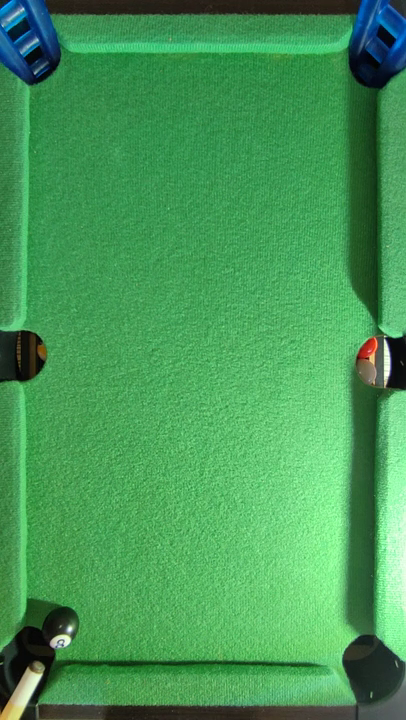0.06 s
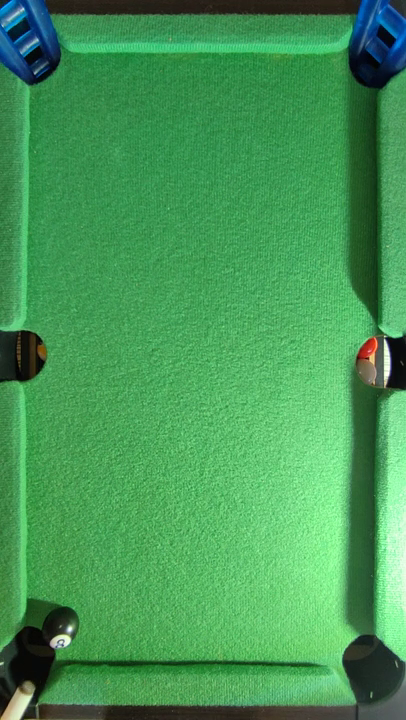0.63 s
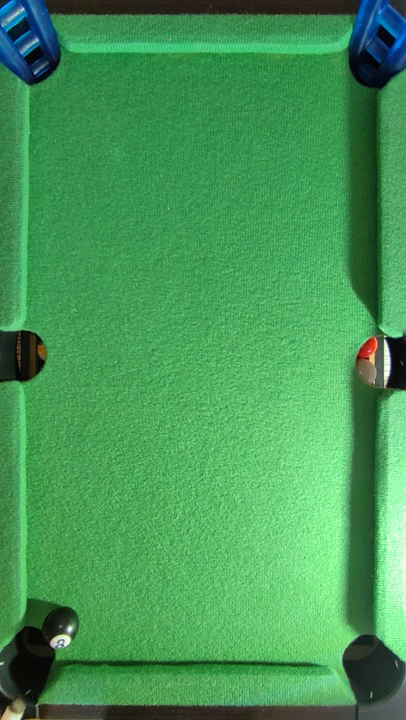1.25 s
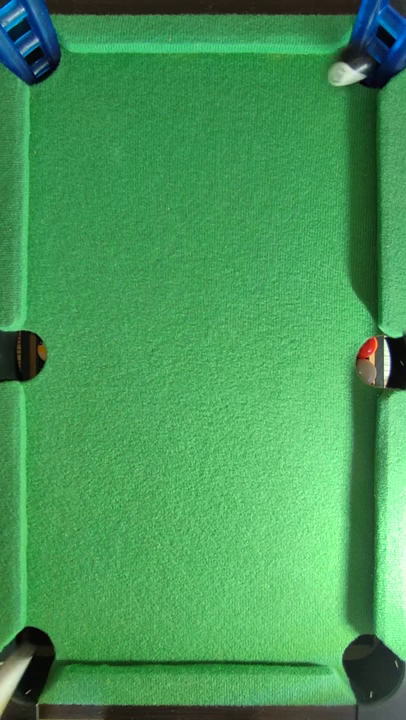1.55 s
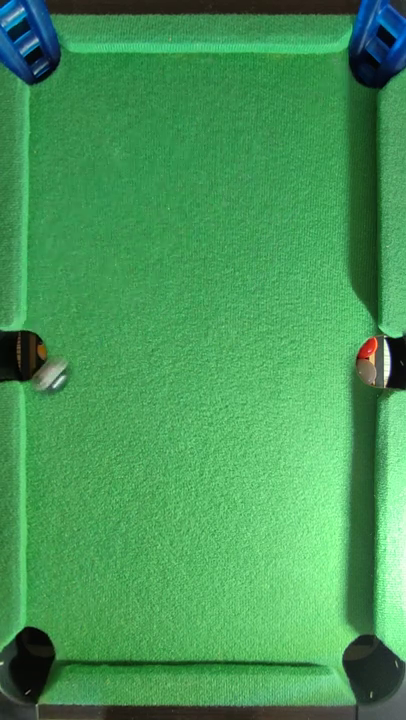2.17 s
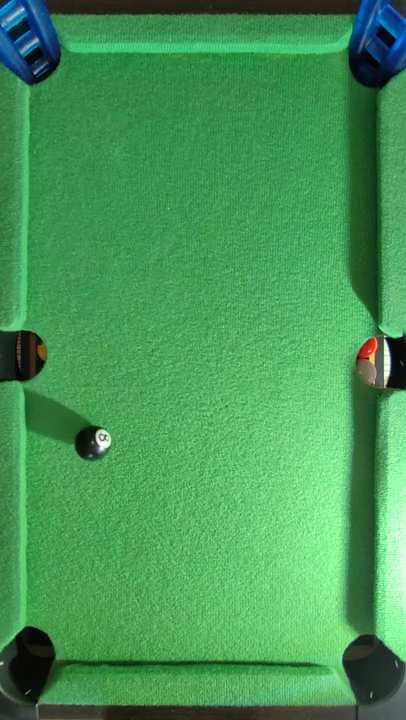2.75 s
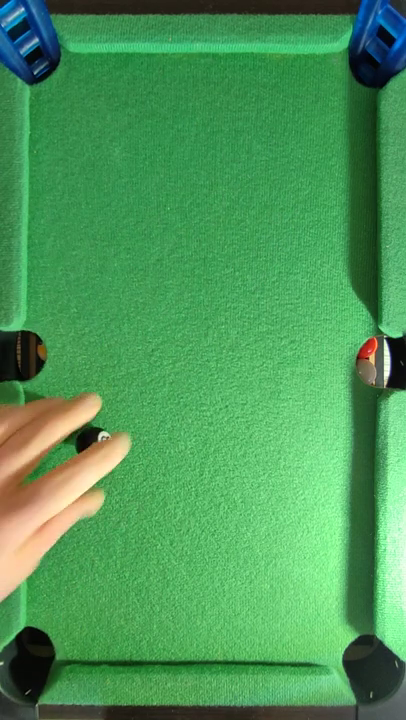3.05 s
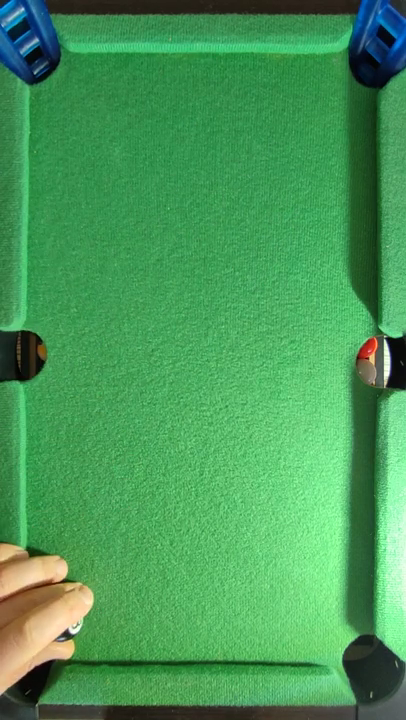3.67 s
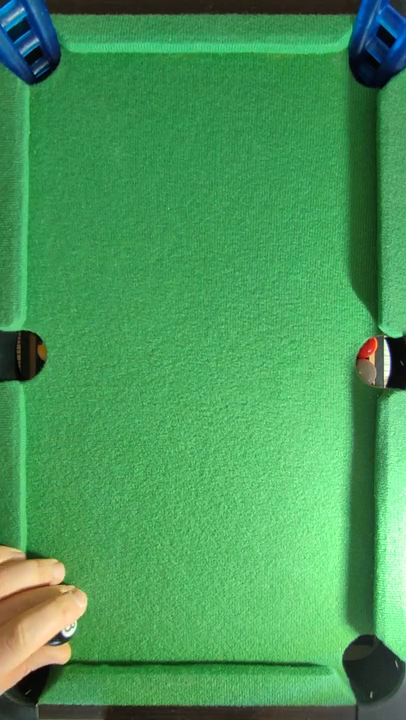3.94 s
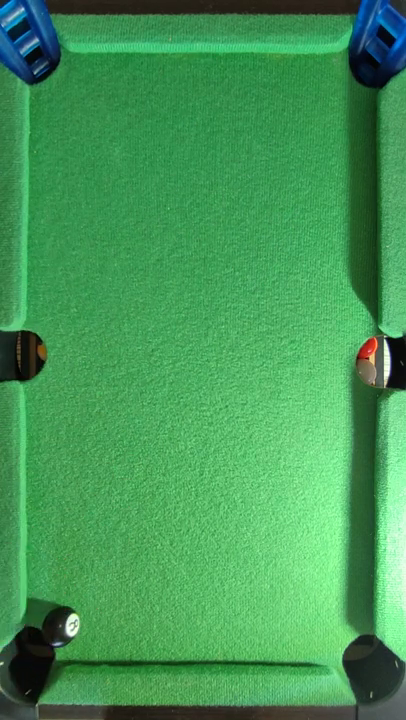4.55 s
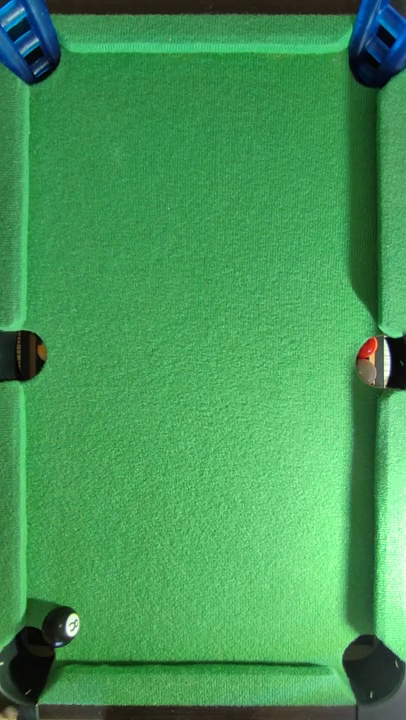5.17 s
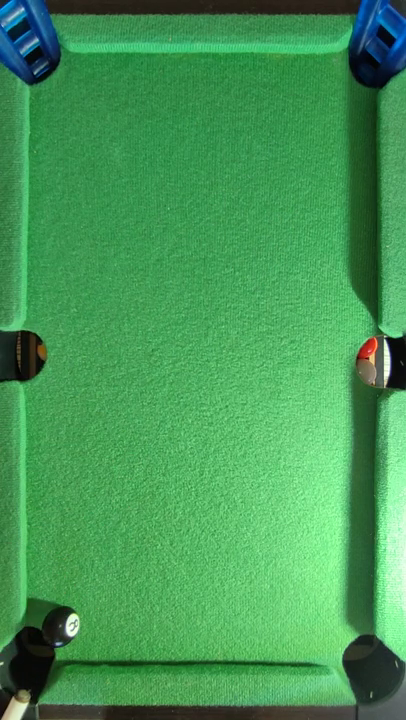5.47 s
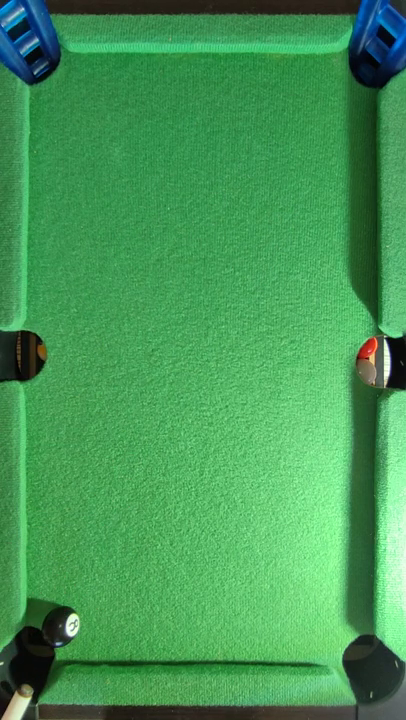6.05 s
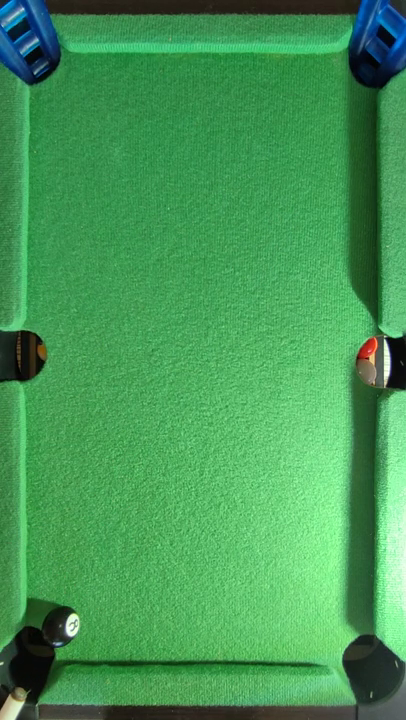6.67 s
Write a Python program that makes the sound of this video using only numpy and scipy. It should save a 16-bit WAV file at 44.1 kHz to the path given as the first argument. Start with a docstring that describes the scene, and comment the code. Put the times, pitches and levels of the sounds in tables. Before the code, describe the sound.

A cue cracks a ball into the cushions of a toy pool table, followed by light taps as a hand puts it back.

```python
"""A ball knocks around a toy pool table, close up in a small room; each hit rings the hollow wooden body.
After a few whispery aiming strokes the cue strikes with a bright tick, a ringing shaft and a shake of
plastic trim. The ball hops, hits the far cushion, then the side one. A hand catches it and puts it back
with light taps and cloth rubs, and the cue is laid on the rail, where it rocks to rest.
Underneath sits a faint bed of rumble, hiss and appliance hum."""
import sys
import numpy as np
from scipy import signal
from scipy.fft import rfft, irfft
from scipy.io import wavfile

SR = 44100
rng = np.random.default_rng(int(sys.argv[2]) if len(sys.argv) > 2 else 0)


def waveform_to_disk(signal):
    """Save audio, clipped to [-1, 1], as 16-bit WAV at the path in sys.argv[1]."""
    frames = np.transpose(np.atleast_2d(signal))
    scaled = np.clip(frames, -1, 1) * 32767
    samples = np.round(scaled).astype(np.int16)
    wavfile.write(sys.argv[1], SR, samples)


N = 300321
SIZE = 32768  # samples in a one-shot
T = np.arange(SIZE) / SR

# room rumble EQ: f/Hz, relative level/dB
RUMBLE_EQ = [(12, -25), (20, 8), (27, -8.5), (70, -9), (103, -5.5), (173, -16.5), (339, -18.5), (369, -19),
             (636, -23.5), (736, -25), (3000, -33), (3900, -71), (6600, -120)]
# microphone hiss EQ: f/Hz, relative level/dB
HISS_EQ = [(1500, -13), (3200, 0), (5000, -1), (7400, -3), (8800, -9.5), (10500, -8), (12000, -5),
           (14200, -4.5)]
# appliance hum: f/Hz, rms level/dB
HUM_TONES = [(100, -77), (149, -82.5), (641, -90.5)]
# cue, hand and a rolling ball brushing the cloth: midpoint t/s, length/s, level/dB, f/Hz
CLOTH_RUBS = [(0.084, 0.17, -74, 2540), (2.972, 0.32, -78, 4000), (3.563, .095, -74.5, 650),
              (4.261, .09, -72.5, 2970), (5.327, 0.17, -69, 2065)]
# knocks: t/s, level/dB, contact cutoff f/Hz, rail share/0-1, stand boom level/dB, pan L-R/dB
# in order: shot, landing, hop, far cushion, side cushion, catch, press, cue nudge, cue drop
TABLE_KNOCKS = [(1.4353, -3.5, 4250, 0, -37, -1.28), (1.509, -7, 560, 0.6, -30.5, 0),
                (1.654, -31, 300, .56, -37, 1.5), (1.7755, -1.13, 2000, 0.77, -34, 1.52),
                (2.3406, -26.5, 500, 0.09, -55, 1.5), (3.2263, -44.5, 698, 0.8, -39, 2),
                (3.2335, -33.5, 317, 0.7, -63.5, 0), (5.145, -45, 350, 0, -67, 1),
                (5.4581, -50.5, 2500, 0.12, -65, -0.2)]
# ringing tones of a knock: hollow table body, two lingering room tones (396 and 815.7 Hz) and a bright
# microphone resonance (7142 Hz): f/Hz, t60/s, level/dB hit on the bed, level/dB hit on a rail
KNOCK_TONES = [(190, 0.21, -20, -27.5), (250, 0.01976, -31, -16.5), (344.4, 0.23, -13.5, -25),
               (350, 0.034, -26, -0.5), (359, .3, -31.5, -28.5), (409.6, .12, -11.5, -17.5),
               (396, 0.59, -40, -56), (471, 0.065, -14.5, -12.5), (527.8, 0.081, -21.5, -25.5),
               (603, 0.15, -31, -23), (704, 0.31, -31.5, -25.5), (767, 0.11, -29.5, -17.5),
               (815.7, 0.38, -45, -37), (825, 0.079, -12.5, -12), (1038, .12, -28, -26.5),
               (1180.7, 0.054, -13, -23), (1338, .08, -23.5, -30.5), (1416, 0.014, -6, -12.5),
               (1881, .06, -33, -30.5), (2060, 0.078, -22, -25), (7142, 0.013, -19.5, -33.5)]
# EQ of the table's dense, short overtones: f/Hz, relative level/dB
RATTLE_EQ = [(100, -28), (250, -5), (550, 7), (1000, 3), (1500, -4.5), (2500, -11), (3300, -11.5),
             (4300, -25), (7500, -35), (14000, -35.5)]
# the whole table bouncing on its stand: f/Hz, t60/s, level/dB
STAND_MODES = [(60.4, 1, -11.5), (64.4, .14, -0.5), (114.2, .4, -11)]
# EQ of the bright tick, including the microphone's 7 kHz peak and the dip above it: f/Hz, relative level/dB
TICK_AND_MIC_EQ = [(300, -10), (1200, 5), (2600, -5.5), (3450, 4.5), (4500, 1), (6200, -2.5), (7400, 3),
                   (8300, -16), (10500, -17.5), (13500, -12)]
# cue shaft resonances: f/Hz, width/octaves, t60/s, level/dB
SHAFT_MODES = [(460, .2, .07, -5), (1090, .19, .12, -3), (1602, .1, .1, -3.5), (2120, .15, 0.081, -3.5),
               (3000, .15, .03, -7.5), (5600, .25, .025, -14)]
# hits that ring the shaft, the shot and the drop on the rail: t/s, level/dB
SHAFT_HITS = [(1.4341, -21.5), (5.4581, -24)]
# plastic trim shaken by the shot and the far cushion: t/s, level/dB, t60/s, pan L-R/dB
TRIM_SHAKES = [(1.4353, -17, .025, -2.5), (1.7774, -20.5, .15, 2)]
# light taps of ball, fingers and cue: t/s, level/dB, f/Hz, width/octaves, pan L-R/dB
LIGHT_TAPS = [(1.6525, -34.5, 6300, 0.48, 4), (1.678, -46, 7500, .15, -9), (2.339, -48, 6000, .6, -2.5),
              (3.162, -28.5, 1913, 1.23, -0.5), (3.2345, -24, 240, 0.19, 2), (4.279, -39.5, 2780, 0.77, 1),
              (5.347, -32, 2800, 0.6, -2), (5.461, -33.5, 190, 0.33, -2)]
# room reverb bands: f/Hz, t60/s, level/dB
REVERB_BANDS = [(60, 0.29, -6), (198.9, 0.55, -10), (400.5, 0.45, -8), (800, 0.54, -9), (1600, 0.49, -8.5),
                (3200, 0.52, -7), (7000, .42, -2.5), (13000, 0.3, -3)]


def amp(db):
    """Decibels to gain."""
    return 10 ** (np.asarray(db) / 20)


def curve(points, size):
    """Spread (Hz, value) breakpoints over the FFT bins, joined on a log axis."""
    hz, value = np.transpose(points)
    return np.interp(np.log(np.fft.rfftfreq(size, 1 / SR) + 1), np.log(hz), value)


def unit(x):
    """Normalise to an average energy of one per channel."""
    return x / np.sqrt(np.mean(np.sum(x ** 2, axis=-1)))


def eq(x, db):
    """Minimum-phase EQ from a gain per bin, so attacks have no pre-ring."""
    cepstrum = irfft(db * np.log(10) / 20)
    cepstrum[1:SIZE // 2] *= 2
    cepstrum[SIZE // 2 + 1:] = 0
    return irfft(rfft(x) * np.exp(rfft(cepstrum)))


def peak(hz, octaves):
    """EQ shape of one resonance, in dB per bin."""
    away = np.log2((np.fft.rfftfreq(SIZE, 1 / SR) + 1) / hz) / octaves
    return -20 * np.log10(1 + away ** 2 / 2 + away ** 4 / 10)


def stereo_noise(size, split_hz):
    """White noise, centred in the bass and wide above split_hz."""
    mid, side = rfft(rng.standard_normal((2, size)))
    alike = 1 / (1 + (np.fft.rfftfreq(size, 1 / SR) / split_hz) ** 2)
    mid, side = mid * np.sqrt((1 + alike) / 2), side * np.sqrt((1 - alike) / 2)
    return irfft(np.array([mid + side, mid - side]), size)


def decay(t60):
    """Envelope that falls 60 dB in t60 seconds."""
    return np.exp(-np.log(1000) * T / t60)


def pan(db):
    """Stereo gains with the left db above the right."""
    return amp(np.array([[db], [-db]]) / 2)


def time_pan(x, lag_ms):
    """Sound reaches the nearer side first; a positive lag delays the left."""
    delay_s = np.maximum([[lag_ms], [-lag_ms]], 0) / 1000
    return irfft(rfft(x) * np.exp(-2j * np.pi * np.fft.rfftfreq(SIZE, 1 / SR) * delay_s))


def add(out, s, x):
    """Mix a sound in at s seconds."""
    start = max(int(s * SR), 0)
    out[:, start:start + x.shape[-1]] += x[..., :N - start]


def noise_bed(spectrum, db, split_hz):
    """Steady shaped noise at an rms level of db."""
    shaped = irfft(rfft(stereo_noise(N, split_hz)) * amp(curve(spectrum, N)), N)
    return amp(db) * np.sqrt(N) * unit(shaped)


def room_tone(waver=.35):
    """Low room rumble, microphone hiss and an appliance hum that wavers in level and phase."""
    t = np.arange(N) / SR
    knots = np.arange(0, N / SR + 1, .1)
    hum = 0
    for hz, db in HUM_TONES:
        swell, drift = (np.interp(t, knots, row) for row in rng.standard_normal((2, len(knots))))
        hum += amp(db) * np.sqrt(2) * (1 + waver * swell) * np.sin(2 * np.pi * hz * t + drift)
    rumble = noise_bed(RUMBLE_EQ, db=-66.5, split_hz=100)
    hiss = noise_bed(HISS_EQ, db=-77, split_hz=1200)
    return rumble + hiss + hum


def rub(length, db, hz, octaves, grain_db=3, grain_samples=128):
    """Friction of wood, skin or cloth: fine grainy slips that swell and fade with the stroke."""
    noise = stereo_noise(SIZE, 1500)
    grain = amp(grain_db * np.repeat(rng.standard_normal(SIZE // grain_samples), grain_samples))
    slips = np.sqrt(SIZE) * unit(eq(noise * grain, peak(hz, octaves)))
    stroke = np.sin(np.pi * np.minimum(T / length, 1)) ** 2
    return amp(db) * slips * stroke * pan(-2)


def aiming(count=5, start_s=.645, period_s=.143, shot_s=1.345):
    """The cue whispers to and fro over the hand, then slides through louder for the shot."""
    out = np.zeros((2, N))
    slide = dict(length=.145, hz=7240, octaves=.13)
    for k in range(count):
        add(out, start_s + k * period_s, rub(db=-80.5, **slide))
    add(out, shot_s, rub(db=-71, **slide))
    return out


def click(t60, tail_db):
    """A sharp impulse with a scattered noise tail."""
    return (T == 0) + amp(tail_db) * unit(stereo_noise(SIZE, 900) * decay(t60))


def ring(db, hz, octaves, t60, pan_db, lag_ms=.25):
    """A click coloured by one resonance of the thing that is hit."""
    resonance = unit(eq(click(t60, tail_db=7), peak(hz, octaves)))
    return amp(db) * time_pan(resonance, lag_ms) * pan(pan_db)


def cue_shaft(db):
    """The wooden cue rings in several modes after a hit."""
    return sum(ring(db + mode_db, hz, octaves, t60, pan_db=-2)
               for hz, octaves, t60, mode_db in SHAFT_MODES)


def bright_tick(db, contact_hz, rail, db_per_octave=14, bed_t60=.01, rail_t60=.3):
    """Mic-coloured click of surfaces meeting: louder on a hard contact, buzzing on in the loose rails."""
    level_db = db - 36.5 + db_per_octave * np.log2(contact_hz / 1000)
    t60 = bed_t60 * (rail_t60 / bed_t60) ** rail
    buzz = eq(click(t60, tail_db=9.5), curve(TICK_AND_MIC_EQ, SIZE))
    return amp(level_db) * unit(buzz) * pan(-6)


def knock_ring(db, contact_hz, rail, low_cut_hz=200):
    """The table rings and rattles, with room and mic tones; a softer, longer contact dulls the highs."""
    tones = -sum(amp(bed_db + rail * (rail_db - bed_db)) * decay(t60) * np.sin(2 * np.pi * hz * T)
                 for hz, t60, bed_db, rail_db in KNOCK_TONES)
    burst = stereo_noise(SIZE, 800) * decay(.075)
    rattle = amp(10) * unit(eq(burst, curve(RATTLE_EQ, SIZE)))
    contact = signal.butter(3, min(contact_hz, SR / 3), fs=SR, output="sos")
    # a small panel radiates little bass
    radiation = signal.butter(3, low_cut_hz, "highpass", fs=SR, output="sos")
    return amp(db) * signal.sosfilt(np.vstack([contact, radiation]), tones + rattle)


def stand_boom(db, attack_s=.015):
    """Low bounce of the table on its heavy stand, which takes a moment to get going."""
    modes = sum(amp(mode_db) * decay(t60) * np.sin(2 * np.pi * hz * T)
                for hz, t60, mode_db in STAND_MODES)
    return amp(db) * modes * (1 - decay(attack_s))


def knock(db, contact_hz, rail, boom_db, pan_db, lead_ms_per_db=.15):
    """One hit on the table layers ring, boom and tick; the side it is panned to hears it first."""
    layers = knock_ring(db, contact_hz, rail) + stand_boom(boom_db) + bright_tick(db, contact_hz, rail)
    return time_pan(layers, -lead_ms_per_db * pan_db) * pan(pan_db)


def plastic_trim(db, t60, pan_db):
    """The plastic pockets and trim chatter at one bright resonance."""
    return ring(db, hz=3289, octaves=.085, t60=t60, pan_db=pan_db, lag_ms=0)


def tap(db, hz, octaves, pan_db, t60_at_1khz=.04):
    """A light touch: the higher the pitch, the shorter the tail."""
    t60 = t60_at_1khz / (hz / 1000) ** .475
    return ring(db, hz, octaves, t60, pan_db)


def cue_rocking(count=3, start_s=5.729, period_s=.112, first_db=-38, fall_db=3):
    """The cue rocks to rest on the rail in dull, even bumps, each softer than the last."""
    out = np.zeros((2, N))
    for k in range(count):
        add(out, start_s + k * period_s, tap(first_db - k * fall_db, hz=560, octaves=.77, pan_db=1))
    return out


def reverb(dry, predelay_s=.0049, build_s=.0024):
    """Wall echoes build up after a short gap and hang longest in the mids."""
    noise = rfft(stereo_noise(SIZE, 350))
    onset = 1 - np.exp(-np.maximum(T - predelay_s, 0) / build_s)
    response = 0
    for hz, t60, db in REVERB_BANDS:
        band = curve([(row[0], row[0] == hz) for row in REVERB_BANDS], SIZE)
        response += amp(db) * irfft(noise * band) * unit(onset * decay(t60))
    return signal.fftconvolve(dry, response, axes=1)[:, :N]


def scene():
    """Mix the strokes, knocks, taps and rubs, then add reverb and room tone."""
    dry = aiming() + cue_rocking()
    for s, *hit in TABLE_KNOCKS:
        add(dry, s, knock(*hit))
    for s, *shake in TRIM_SHAKES:
        add(dry, s, plastic_trim(*shake))
    for s, db in SHAFT_HITS:
        add(dry, s, cue_shaft(db))
    for s, *touch in LIGHT_TAPS:
        add(dry, s, tap(*touch))
    for middle_s, length, db, hz in CLOTH_RUBS:
        add(dry, middle_s - length / 2, rub(length, db, hz, octaves=.9))
    return dry + reverb(dry) + room_tone()


def record(dry, high_cut_hz=14300):
    """Soft-clip the loudest peaks and cut the top end steeply."""
    rounded = dry / (1 + dry ** 4) ** (1 / 4)
    return signal.sosfilt(signal.ellip(10, .2, 70, high_cut_hz, fs=SR, output="sos"), rounded)


dry = scene()
out = record(dry)
waveform_to_disk(out)
```